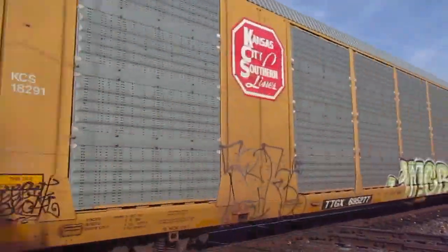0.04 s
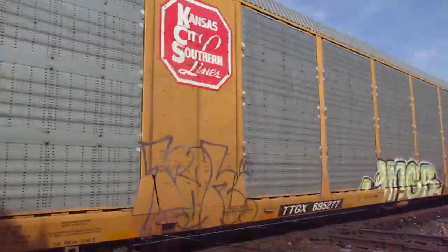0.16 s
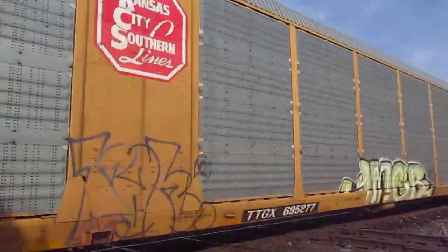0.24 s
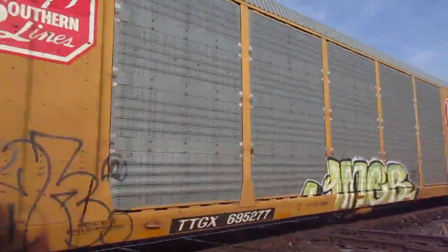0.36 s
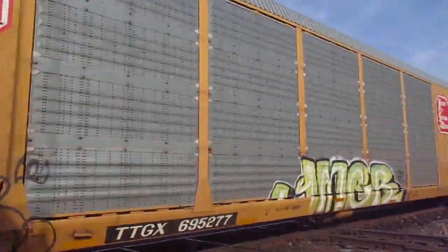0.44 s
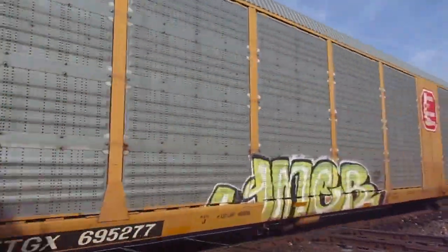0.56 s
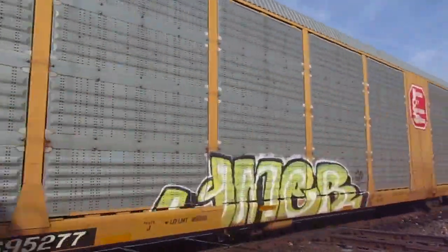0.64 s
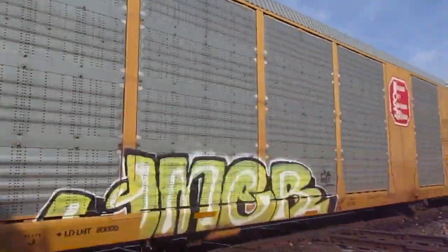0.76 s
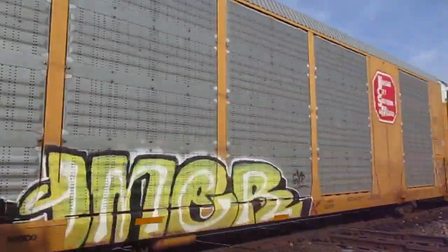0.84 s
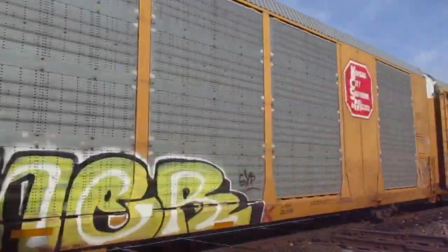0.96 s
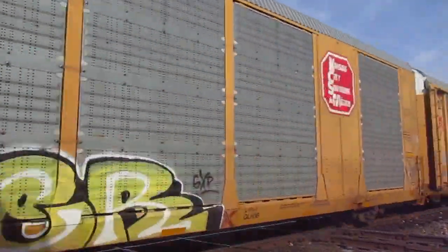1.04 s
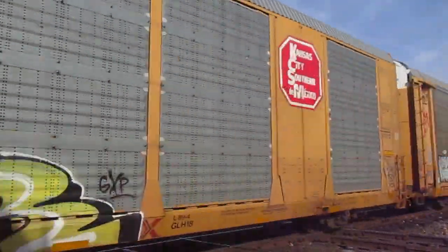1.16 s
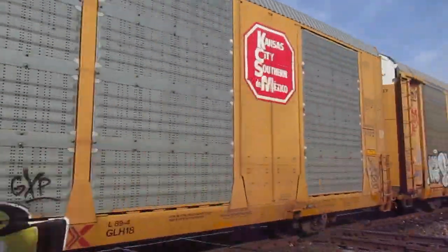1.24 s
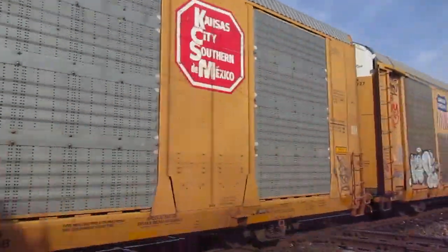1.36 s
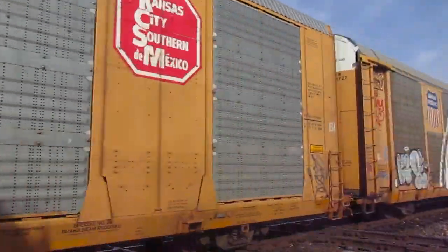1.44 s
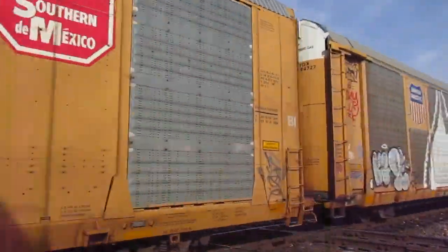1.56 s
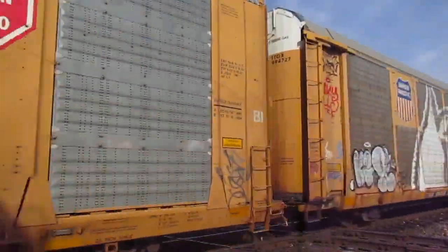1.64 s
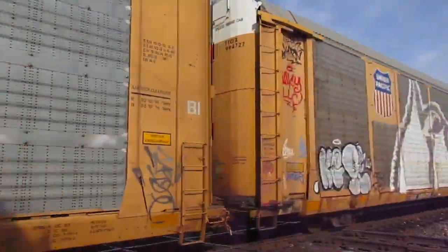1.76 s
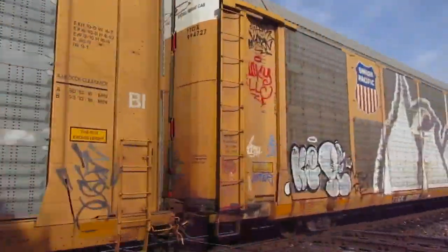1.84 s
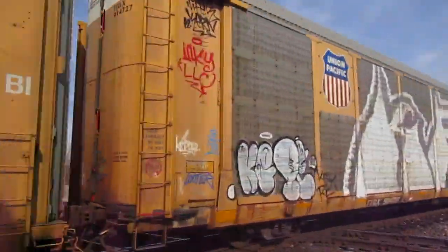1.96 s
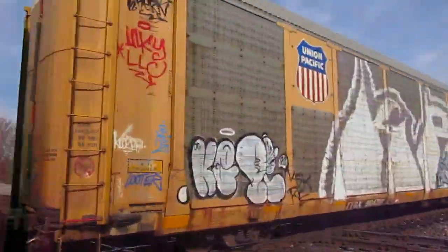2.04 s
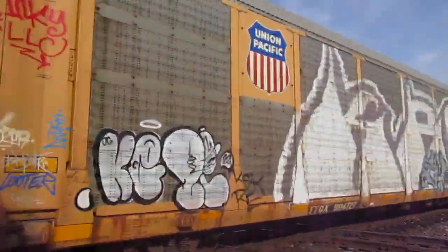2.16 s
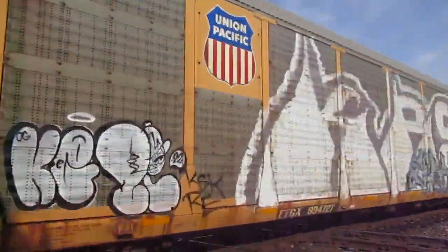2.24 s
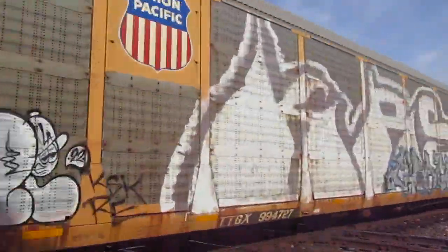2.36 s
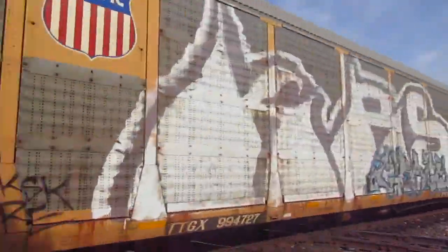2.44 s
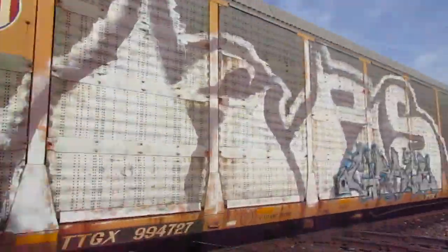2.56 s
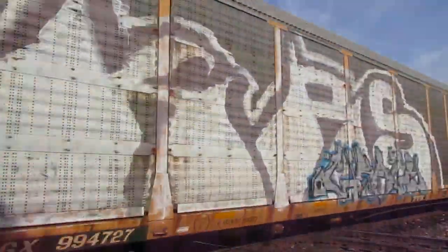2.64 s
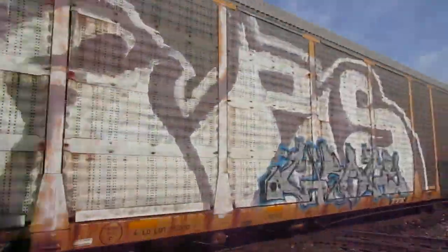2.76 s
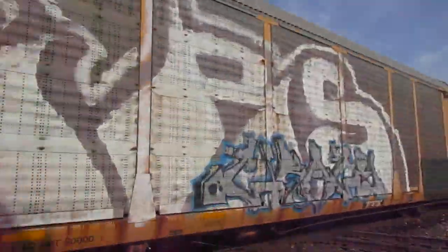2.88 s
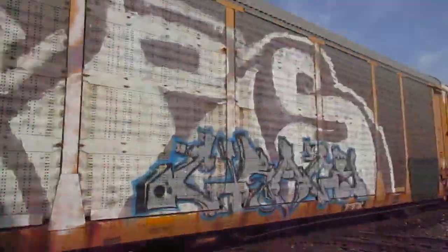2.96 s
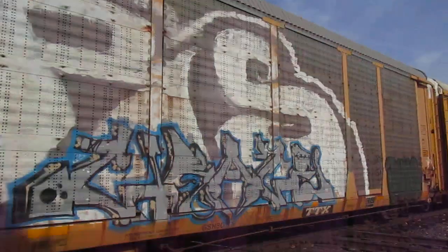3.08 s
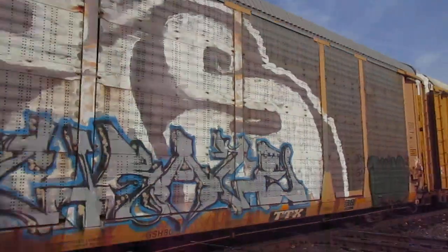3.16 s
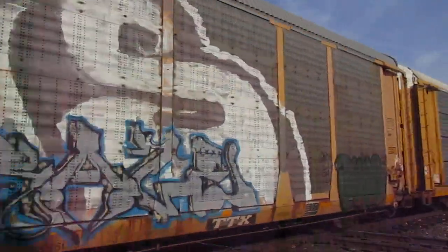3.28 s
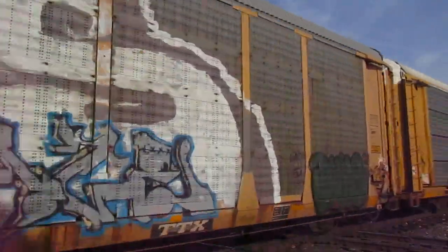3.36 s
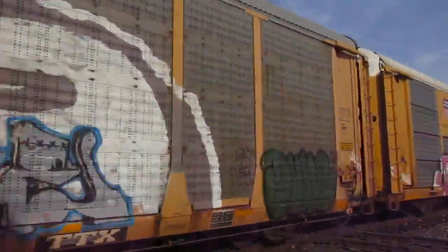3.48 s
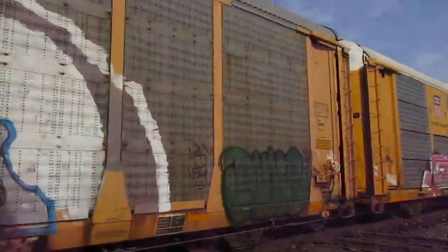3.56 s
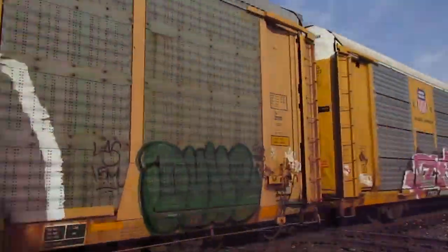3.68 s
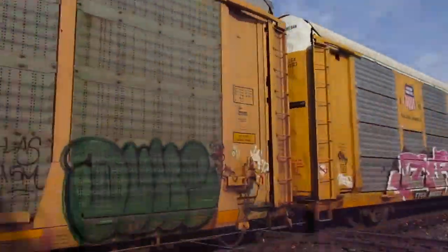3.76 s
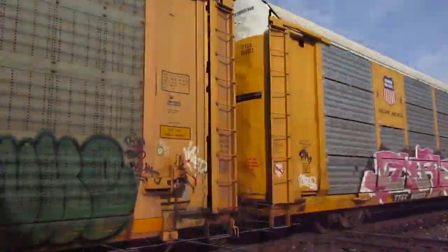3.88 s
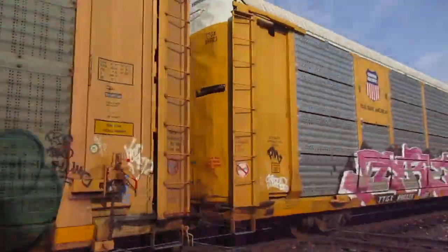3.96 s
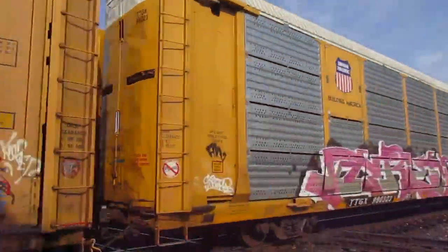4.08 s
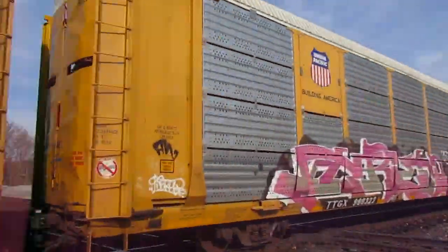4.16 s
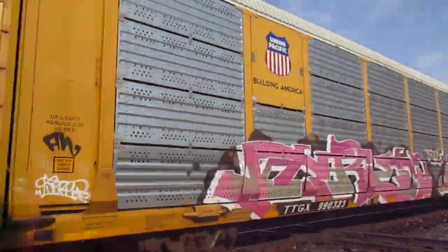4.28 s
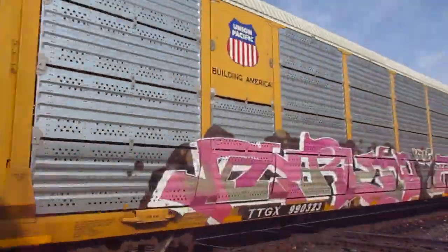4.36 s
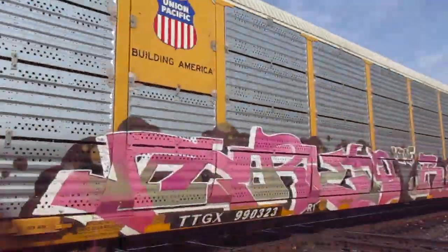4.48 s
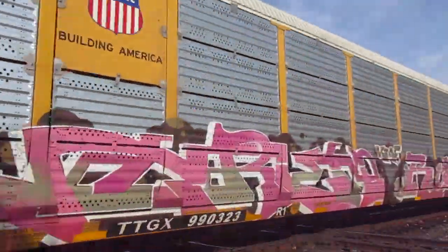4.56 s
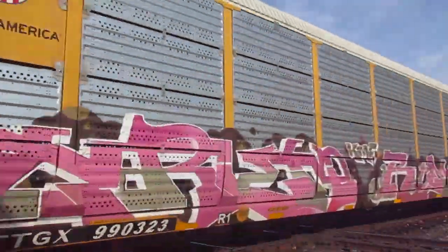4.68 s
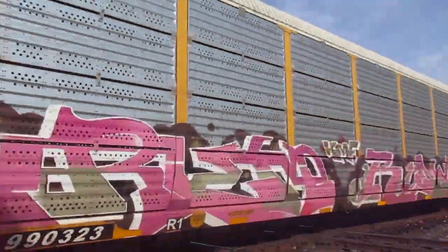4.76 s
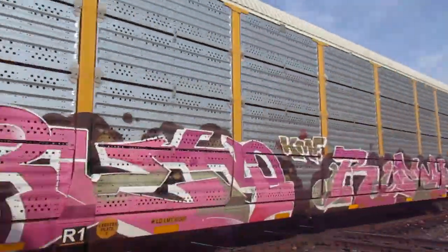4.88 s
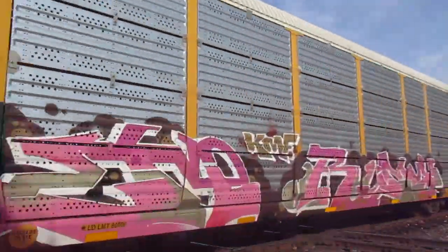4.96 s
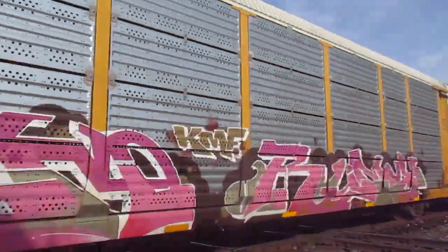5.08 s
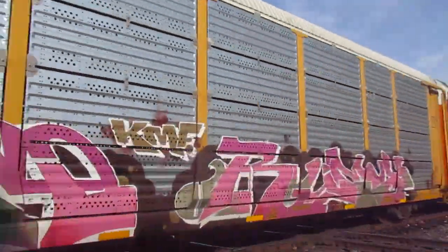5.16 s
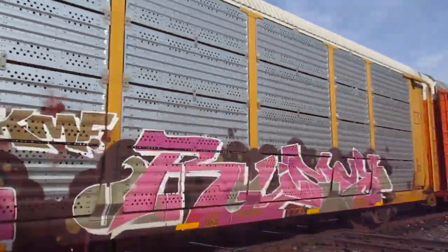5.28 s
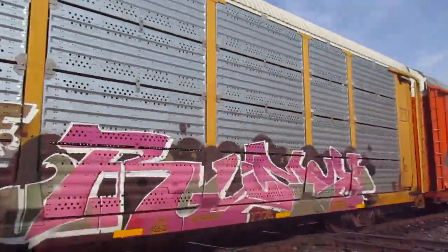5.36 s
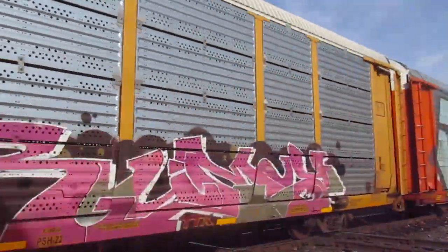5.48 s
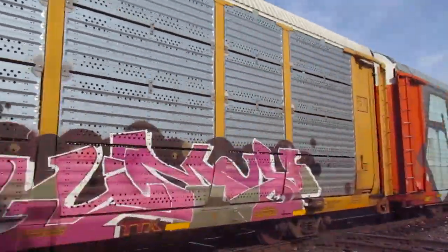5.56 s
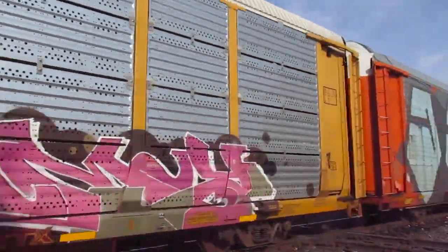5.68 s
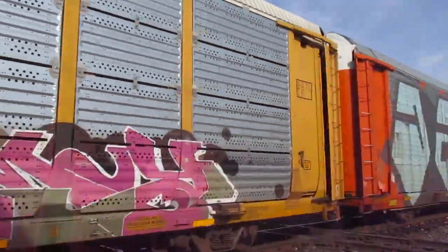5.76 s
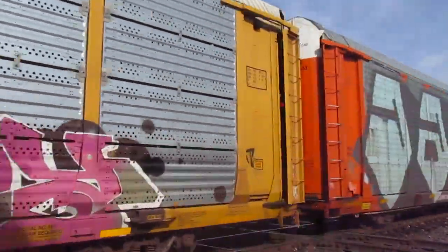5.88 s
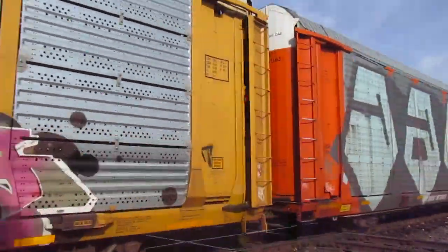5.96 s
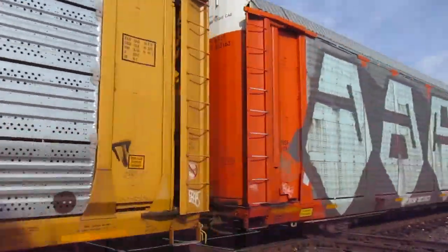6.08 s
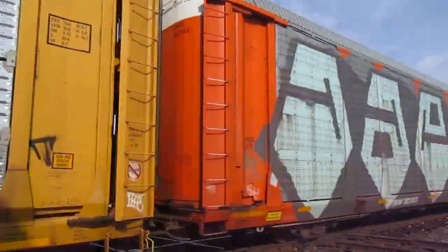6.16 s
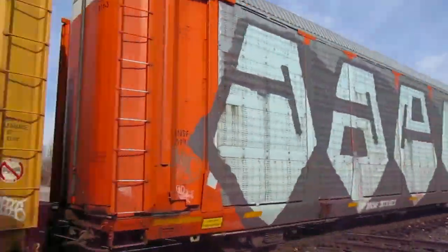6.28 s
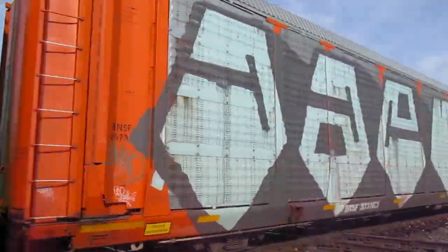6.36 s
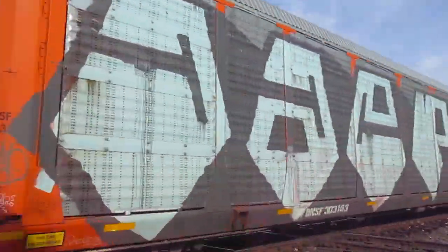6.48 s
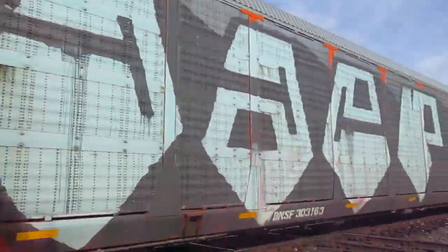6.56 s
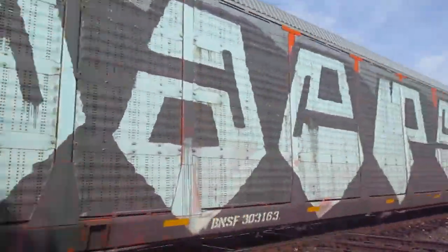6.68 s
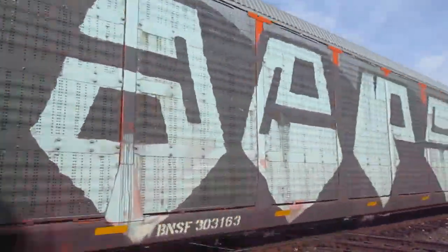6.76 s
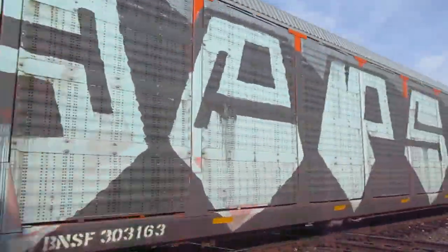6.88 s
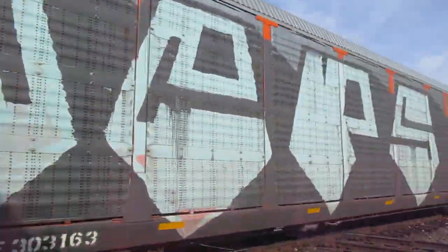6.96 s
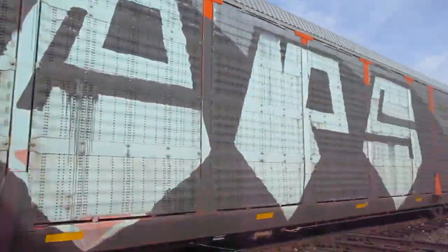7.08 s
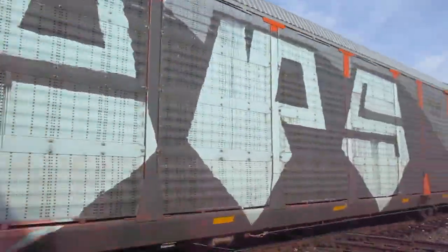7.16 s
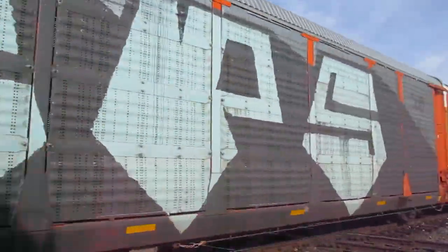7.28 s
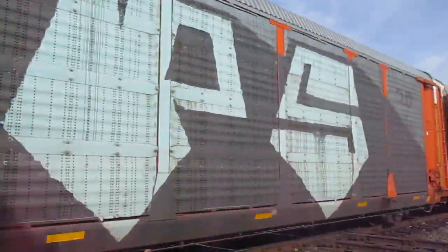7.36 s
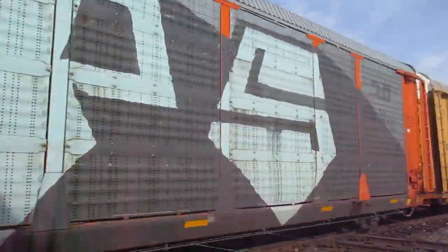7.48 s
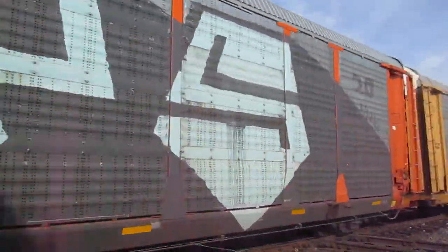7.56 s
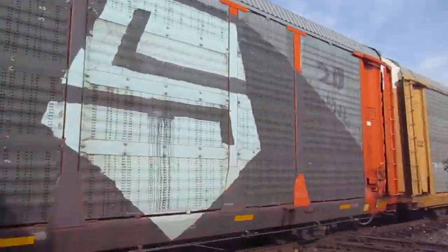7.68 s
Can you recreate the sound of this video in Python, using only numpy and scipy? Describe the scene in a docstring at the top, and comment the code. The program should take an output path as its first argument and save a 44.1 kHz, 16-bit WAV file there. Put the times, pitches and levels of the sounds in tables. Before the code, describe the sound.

Heavy steel wheels bang and ring across track joints in regular surges as tall hollow railcars drum, roar and hum past the trackside.

```python
"""Wheels slam over nearby rail joints as a freight train of tall steel car carriers rolls past.
At each coupling, one every two seconds or so, two trucks of two axles set noisy bursts clattering, booming and ringing.
Single wheels clack hard, as short cracks with ringing modes; the rolling roar is noise that swells with each coupling.
The hollow cars drum and hum as filtered knocks and noise, a wheel sings faintly as a wavering sine, and the
track bed shakes as steady low noise. A soft limiter holds the peaks."""
import sys
import numpy as np
from scipy import signal
from scipy.fft import rfft, irfft, next_fast_len
from scipy.io import wavfile
from scipy.ndimage import uniform_filter1d, minimum_filter1d, map_coordinates

SR = 44100
rng = np.random.default_rng(int(sys.argv[2]) if len(sys.argv) > 2 else 0)


def waveform_to_disk(signal):
    """Save audio, clipped to [-1, 1], as 16-bit WAV at the path in sys.argv[1]."""
    frames = np.transpose(np.atleast_2d(signal))
    scaled = np.clip(frames, -1, 1) * 32767
    samples = np.round(scaled).astype(np.int16)
    wavfile.write(sys.argv[1], SR, samples)


N = 340893

# couplings passing, timed when the first axle meets the first joint; the last three columns are the car behind:
# (time [s], speed [m/s], leading truck [dB], trailing truck [dB], rumble [dB], roar [dB], drone pitch [Hz])
COUPLINGS = [(-.984, 13.65, -1, -0.5, 1, 1.4, 260), (1.15, 13.7, -1.2, 0.7, -0.43, -0.23, 308),
             (3.287, 13.42, 0.78, -2, -0.69, -0.23, 219), (5.426, 13.36, -1.1, 0.7, -0.25, 0.52, 235),
             (7.588, 15, .8, 0, 0.082, 0, 225)]
# near rail joints: (place along the track [m], leading truck level [dB], trailing truck level [dB],
# boom level [dB], swell time [s], t60 [s], brightness [dB/octave])
RAIL_JOINTS = [(0, 0, -4, -0.5, 0.014, .28, -0.85), (2.95, -8.5, -13, 3, 0.015, .34, 0),
               (4.0, -.5, -0.2, -3.5, 0.014, .29, .5), (5.42, -5.5, -4, 2, .014, 0.39, 1),
               (10.2, -4.5, -26, -4, 0.013, 0.3, -0.5)]
# single hard wheel clacks: (time [s], level [dB], brightness [dB/octave],
# pitch before tuning around which the wheel's modes ring most [Hz], tuning [ratio])
WHEEL_CLACKS = [(.414,-11.5,1,1970,1), (.534,-7.8,-1,1000,1), (1.127,-16,-7,1000,1),
                (2.542,-10.5,-0.5,1980,0.96), (2.674,-8,-1,4050,1), (4.694,-9.5,-.5,1000,0.89),
                (4.821,-9,0,4050,.885), (6.838,-14,-1.5,1200,1), (6.958,-8.5,0,1020,1),
                (7.554,-19,0,1200,1)]
# modes of a struck wheel before tuning: (pitch [Hz], level [dB], t60 [s])
WHEEL_MODES = [(1029, -4, 0.12), (1234, -15, 0.26), (2013, -8.5, 0.28), (2540, -13, 0.23),
               (3290, -11.5, 0.24), (3630, -24, 0.2), (4040, -11.5, 0.28), (4960, -38, 0.17),
               (5730, -26, 0.25)]
# resonances of the hollow car body: (centre [Hz], width [Hz], level [dB])
BODY_MODES = [(79, 14.4, -7), (129, 27.5, -7.5), (187.7, 19.4, -3.5), (221.2, 12, 4.5), (258.7, 8.7, 1.5),
              (303.5, 26.4, -4)]
# broad resonances of the rail and side panels: (centre [Hz], width [Hz], boost [dB])
PANEL_MODES = [(655, 110, 0), (1144, 44, 3), (1280, 34, 1.5), (1480, 81, 3.5), (1930, 240, 6.5),
               (2510, 140, 2.5), (3930, 820, -2.5)]
# a wheel singing against the rail: (time at the loudest [s], length [s], mid pitch [Hz], level [dB])
SINGING_NOTES = [(0.36, .62, 3415, -38.5), (2.035, .06, 3780, -27), (2.59, .09, 1980, -34),
                 (4.55, .12, 3650, -37), (6.73, .36, 3420, -38.5)]

# noise colour of the clashing steel: (frequency [Hz], relative density [dB/Hz])
SLAM_COLOUR = [(150,-25),(250,-10),(400,-11),(620,-1),(950,-8.5),(1220,-3.5),(1630,-13.5),(2600,-13),(3900,-16),(4600,-22),(8500,-31),(12000,-43),(15000,-54)]
# noise colour of a wheel's crack: (frequency [Hz], relative density [dB/Hz])
CLACK_COLOUR = [(120, -19), (300, 2.5), (430, 0.5), (900, 0), (1500, -9), (3200, -13.5), (4000, -17.5),
                (5000, -23.5), (8000, -33), (15000, -49)]
# noise colour of the rolling rumble: (frequency [Hz], relative density [dB/Hz])
RUMBLE_COLOUR = [(20,-43),(35,-14.5),(70,-10),(130,-5.5),(220,-2),(320,-8.5),(450,-12),(650,-19.5),(1000,-71)]
# noise colour of the rolling roar: (frequency [Hz], relative density [dB/Hz])
ROAR_COLOUR = [(150, -29), (350, 1), (650, 1), (1000, -4.5), (1600, -9), (2300, -13), (3500, -25.5),
               (7000, -83)]
# noise colour of the rolling hiss: (frequency [Hz], relative density [dB/Hz])
HISS_COLOUR = [(1200, -46), (2400, 0), (3800, -1.5), (4800, -9), (8000, -19.5), (11000, -29.5),
               (15000, -45)]
# noise colour of the shaking track bed: (frequency [Hz], relative density [dB/Hz])
GROUND_COLOUR = [(20, -14), (45, 5), (125, 18), (170, 15), (400, -55)]

# rumble swell at each coupling, relative levels:
# (between couplings [dB], beside the trucks [dB], attack [s], held until [s], release [s])
RUMBLE_SWELL = (-25, -15, 0.07, 1.2, 0.2)
# roar swell: (between couplings [dB], beside the trucks [dB], attack [s], held until [s], release [s])
ROAR_SWELL = (-27.6, -15.1, 0.11, 1.0872, 0.68)
# hiss swell: (between couplings [dB], beside the trucks [dB], attack [s], held until [s], release [s])
HISS_SWELL = (-39.8, -24.5, .06, 1.0969, .6)
# drumming swell; its negative third value gives no gradual rise, the drumming comes up abruptly:
# (between couplings [dB], beside the trucks [dB], negative for an abrupt start [s], held until [s], release [s])
DRUM_SWELL = (-28.5, -16.5, -0.08, 1.19, 0.6)

WHEELBASE_M, TRUCK_GAP_M = 1.66, 8.45  # axle to axle in a truck; truck to truck across a coupling
FAR_JOINT_M, FAR_JOINT_DB, FAR_RING_HZ = 14.0, -23.5, 2000  # a distant joint that only ticks
CLACK_T60_S = 0.18
FULL_AT_S = 0.04  # the swell is complete this long after the first axle meets the first joint
TOP_HZ = 15000  # band limit of the mix


def slams(clash_db=-8.0, fittings_db=-12, boom_db=-8, ring_db=-16, boom_t60_s=0.45, hold_s=0.047):
    """Each wheel on a near joint sets panels and fittings clashing, booms in the car body and rings."""
    track, t = np.zeros(N), np.arange(SR // 2) / SR
    dying = np.hypot(t, hold_s) - hold_s  # the clash holds before it falls
    for joint_m, leading_db, trailing_db, body_db, swell_s, t60_s, bright_db in RAIL_JOINTS:
        rise = t ** 2 / (t ** 2 + swell_s ** 2 + 1e-9)
        for s, truck, db in crossings(joint_m):
            panels = noise(lambda hz: steel(hz) + bright_db * np.log2(0.5 + hz / 2000), len(t))
            clash = panels * chatter(rate_hz=170, life_s=0.0036, depth=0.71, size=len(t))
            clash += amp(fittings_db) * fittings(t)
            clash *= amp(clash_db - 60 * dying / t60_s)
            boom = body_noise(len(t)) * amp(boom_db + body_db - 60 * t / boom_t60_s)
            ring = amp(ring_db) * wheel_ring(t, focus_hz=1800, focus_db=-0.5, spread=0.032)
            strength = amp(db + (trailing_db if truck else leading_db))
            add(track, s, strength * rise * (clash + boom + ring))
    return track


def steel(hz):
    """Colour of clashing steel in dB: the broad slam spectrum lifted or dipped at the panel resonances."""
    resonances = sum(db / (1 + (2 * (hz - centre) / width) ** 2) for centre, width, db in PANEL_MODES)
    return along(SLAM_COLOUR, hz) + resonances


def fittings(t, count=60, span_s=0.17, t60_s=0.055):
    """Loose chains and panel plates clink at random moments, each a dying sine at its own pitch."""
    draws = rng.random((count, 2))
    hz = 500 * 10 ** draws[:, :1]  # 500 to 5000 Hz
    age = t[:SR // 16]
    envelope = amp(-60 * age / t60_s) * (1 - np.exp(-age / 0.00037))
    clinks = amp(steel(hz)) * np.sqrt(hz) * np.sin(2 * np.pi * hz * age) * envelope
    index = (span_s * SR * draws[:, 1:]).astype(int) + np.arange(len(age))
    return unit(np.bincount(index.ravel(), clinks.ravel(), len(t))[:len(t)])


def clacks(crack_db=-4.0, ring_db=-8, thud_db=-14, thud_t60_s=0.54, attack_s=0.00034, hold_s=0.004):
    """Short, hard blows of single wheels, and the tick of every axle on the distant joint: crack, thud, ring."""
    track, t = np.zeros(N), np.arange(SR // 2) / SR
    dying = np.hypot(t, hold_s) - hold_s
    onset = 1 - np.exp(-t / attack_s)
    ticks = [(s, FAR_JOINT_DB + db, 0, FAR_RING_HZ, 1) for s, _, db in crossings(FAR_JOINT_M)]
    for s, db, bright_db, focus_hz, tuning in WHEEL_CLACKS + ticks:
        crack = noise(lambda hz: along(CLACK_COLOUR, hz) + bright_db * np.log2(0.5 + hz / 2000), len(t))
        crack *= amp(crack_db - 60 * dying / CLACK_T60_S)
        thud = body_noise(len(t)) * amp(thud_db - 60 * t / thud_t60_s)
        ring = amp(ring_db) * wheel_ring(t, focus_hz, focus_db=6.5, spread=0.0028, tuning=tuning)
        add(track, s, amp(db) * onset * (crack + thud + ring))
    return track


def wheel_ring(t, focus_hz, focus_db, spread, tuning=1):
    """Wheel modes, strengths and pitches new at each blow, weaker per octave from the focus before tuning."""
    ring = np.zeros(len(t))
    waver = 0.64 * wobble(118, len(t))  # the rolling contact unsteadies the ring
    for hz, db, t60_s in WHEEL_MODES:
        phase = 2 * np.pi * hz * tuning * (1 + spread * rng.normal()) * t + waver
        level_db = db + 2 * rng.normal() - abs(focus_db * np.log2(hz / focus_hz))
        ring += amp(level_db - 60 * t / t60_s) * np.sin(phase)
    return ring


def crossings(joint_m):
    """(time [s], truck 0 or 1, level [dB]) for every axle that rolls over a joint."""
    axles = []
    for s, speed, leading_db, trailing_db, *_ in COUPLINGS:
        for truck, db in enumerate([leading_db, trailing_db]):
            for axle in range(2):
                distance_m = joint_m + truck * TRUCK_GAP_M + axle * WHEELBASE_M
                axles.append((s + distance_m / speed, truck, db))
    return [row for row in axles if -0.5 < row[0] < N / SR]


def rolling(rumble_db=-3, drum_db=-7, roar_db=-3, hiss_db=-3):
    """Rough treads roar and hiss on the rail; uneven knocks of the running gear drum on the body."""
    s, *_, car_rumble_db, car_roar_db, _ = np.transpose(COUPLINGS)
    passing = np.searchsorted(s, np.arange(N) / SR) - 1  # which car is alongside
    rumble = amp(rumble_db + swell(*RUMBLE_SWELL)) * noise(lambda hz: along(RUMBLE_COLOUR, hz))
    drum = amp(drum_db + swell(*DRUM_SWELL)) * drumming()
    roar = amp(roar_db + swell(*ROAR_SWELL)) * noise(lambda hz: along(ROAR_COLOUR, hz))
    roar *= chatter(rate_hz=32, life_s=0.0025, depth=0.86, size=N)
    hiss = amp(hiss_db + swell(*HISS_SWELL)) * noise(lambda hz: along(HISS_COLOUR, hz))
    hiss *= chatter(rate_hz=100, life_s=0.0051, depth=0.33, size=N)
    return amp(car_rumble_db[passing]) * (rumble + drum) + amp(car_roar_db[passing]) * (roar + hiss)


def drumming(rate_hz=19):
    """Knocks of the running gear, uneven in time and strength, excite the hollow body's resonances."""
    knocks = np.zeros(N)
    for k, (late, size_db) in enumerate(rng.standard_normal((int(rate_hz * N / SR), 2))):
        add(knocks, (k + 0.2508 * late) / rate_hz, amp([size_db]))
    return unit(filtered(knocks, body))


def swell(far_db, near_db, attack_s, until_s, release_s):
    """Level in dB of a rolling sound: up, held and down at each coupling; abruptly up if attack_s is negative."""
    t = np.arange(N) / SR
    corners = [FULL_AT_S - attack_s, FULL_AT_S, until_s, until_s + release_s]
    near = [np.interp(t - s, corners, [0, 1, 1, 0]) for s, *_ in COUPLINGS]
    return far_db + (near_db - far_db) * np.max(near, axis=0)


def drone(db=-30.0, width_hz=30, start_s=1.05, length_s=1.05):
    """Each hollow car hums at its own pitch, a narrow band of noise, while its side goes by."""
    track = np.zeros(N)
    passing = np.sin(np.linspace(0, np.pi, int(length_s * SR)))
    for s, *_, car_db, _, pitch in COUPLINGS:
        hum = noise(lambda hz: -20 * np.log10(1 + ((hz - pitch) / width_hz) ** 2), len(passing))
        add(track, s + start_s, amp(db + car_db) * passing * hum)
    return track


def singing(fall=0.025, waver=0.69):
    """A rubbed wheel holds one fuzzy note that sinks by the fraction fall per second as it moves away."""
    track = np.zeros(N)
    for s, length_s, hz, db in SINGING_NOTES:
        u = np.linspace(0, 1, int(length_s * SR))
        pitch = hz * (1 - fall * length_s * (u - 0.5))
        phase = 2 * np.pi * np.cumsum(pitch) / SR + waver * wobble(155, len(u))
        add(track, s - length_s / 2, amp(db) * np.sqrt(2) * np.sin(np.pi * u) * np.sin(phase))
    return track


def ground(db=-35.5):
    """The weight of the whole train shakes the track bed steadily, as low noise."""
    return amp(db) * noise(lambda hz: along(GROUND_COLOUR, hz))


def body(hz, top_hz=900):
    """Causal response of the car body's resonances; the heavy body passes little treble."""
    modes = 0
    for k, (centre, width, db) in enumerate(BODY_MODES):
        damping = 1j * hz * width
        modes = modes + (-1) ** k * amp(db) * damping / (centre ** 2 - hz ** 2 + damping)
    return modes / (1 + 1j * hz / top_hz)


def body_noise(size):
    """Noise of rms 1 coloured by the car body's resonances."""
    return unit(filtered(rng.standard_normal(size), body))


def chatter(rate_hz, life_s, depth, size):
    """Envelope of loose steel parts knocking at random: each knock rises within a millisecond and dies away."""
    knocks = (rng.random(size) < rate_hz / SR) * rng.exponential(size=size)
    power = signal.lfilter([1], [1, -np.exp(-1 / (life_s * SR))], knocks)
    return unit(uniform_filter1d(np.sqrt(1 + abs(depth) * power), size=40))


def noise(colour_db, size=N):
    """Noise of rms 1 whose level is a function of frequency."""
    return unit(filtered(rng.standard_normal(size), lambda hz: amp(colour_db(hz))))


def filtered(x, response):
    """x passed through a complex response of frequency."""
    m = next_fast_len(len(x) + 8192)  # padded to keep tails from wrapping round to the start
    return irfft(rfft(x, m) * response(np.fft.rfftfreq(m, 1 / SR)), m)[:len(x)]


def wobble(rate_hz, size=N):
    """A smooth random curve with rate_hz knots a second."""
    knots = rng.standard_normal(int(size * rate_hz / SR) + 4)
    return map_coordinates(knots, [np.arange(size) * rate_hz / SR])


def along(points, hz):
    """(frequency [Hz], value) points read on a log frequency axis."""
    f, v = np.transpose(points)
    return np.interp(np.log(hz + 1), np.log(f), v)


def amp(db):
    """Decibels to gain."""
    return 10 ** (np.asarray(db) / 20)


def unit(x):
    """Scale to rms 1."""
    return x / np.sqrt(np.mean(x ** 2) + 1e-20)


def add(track, s, sound):
    """Mix a sound into a track at time s, cut to the track's ends."""
    start = round(s * SR)
    sound, start = sound[max(-start, 0):], max(start, 0)
    track[start:start + len(sound)] += sound[:max(N - start, 0)]


def scene():
    """All of the train, heard from beside the track."""
    return (slams() + clacks() + rolling() + drone() + singing() + ground())[None]


def record(dry, ceiling_db=-2.0):
    """A fast limiter with a soft knee holds the peaks, then a filter removes all above the band limit."""
    needed = (1 + (dry[0] / amp(ceiling_db)) ** 6) ** (-1 / 6)
    gain = uniform_filter1d(minimum_filter1d(needed, size=260), size=200)  # windows in samples
    return filtered(dry[0] * gain, lambda hz: hz < TOP_HZ)[None]


dry = scene()
out = record(dry)
waveform_to_disk(out)
```